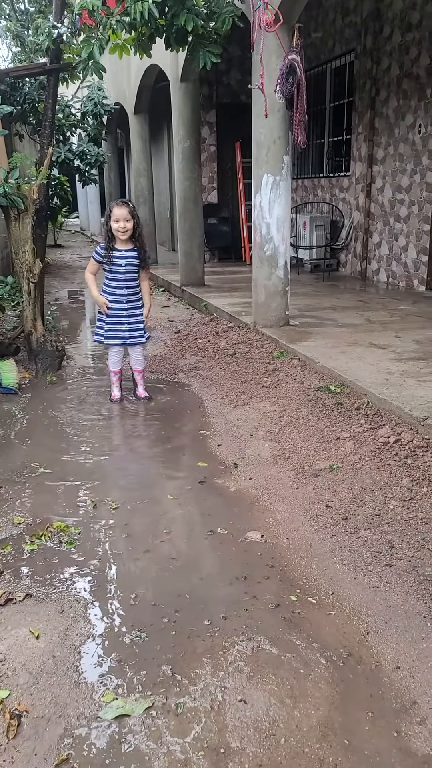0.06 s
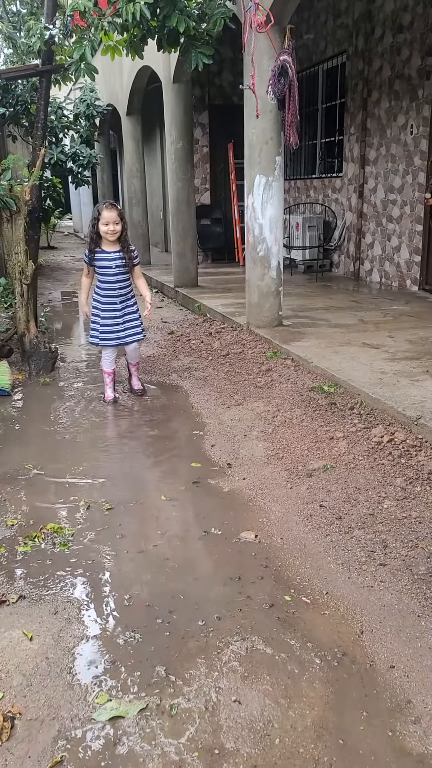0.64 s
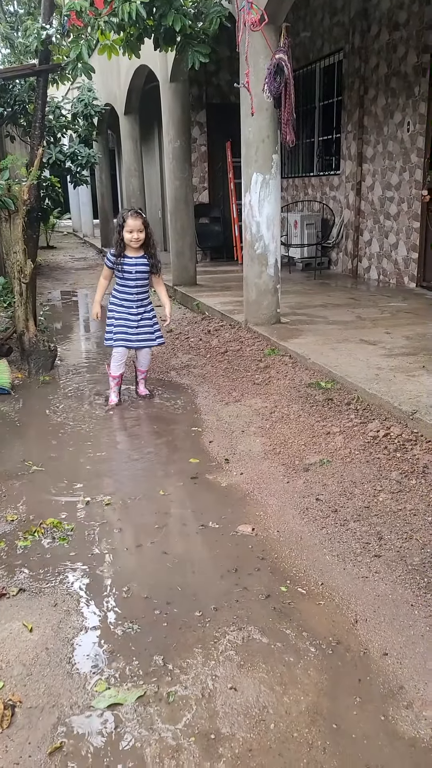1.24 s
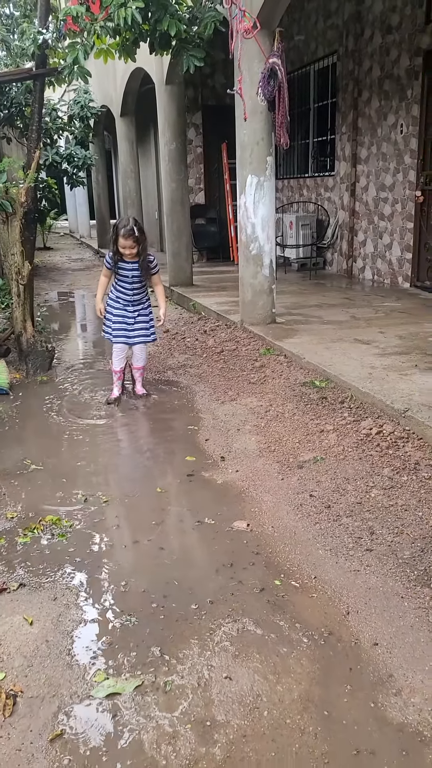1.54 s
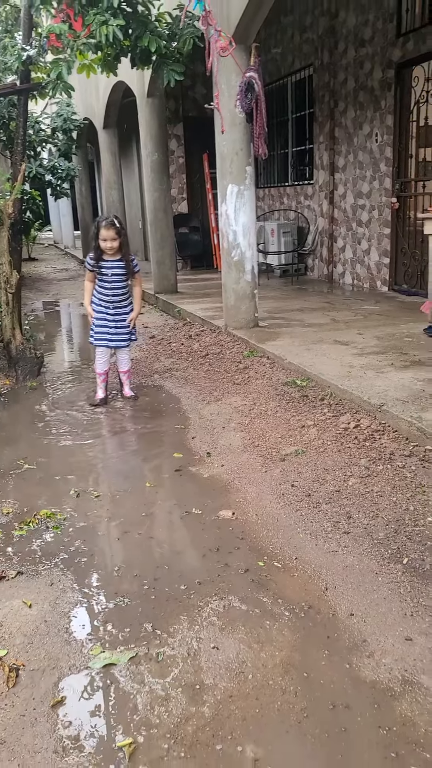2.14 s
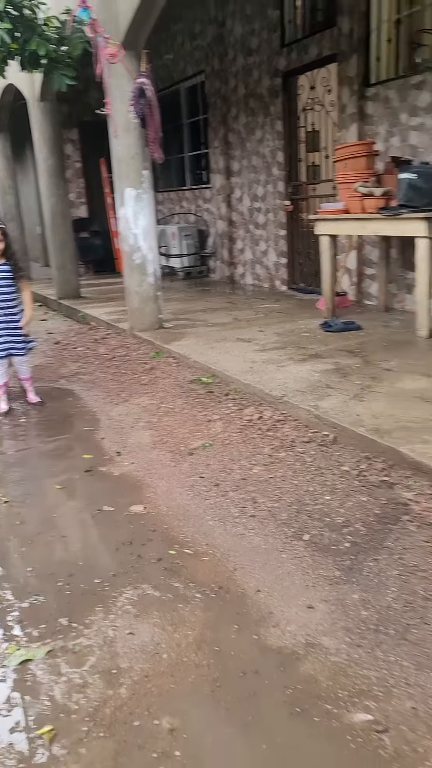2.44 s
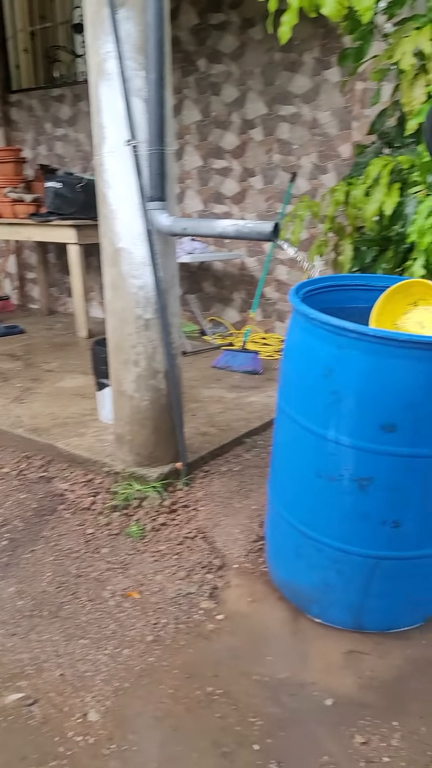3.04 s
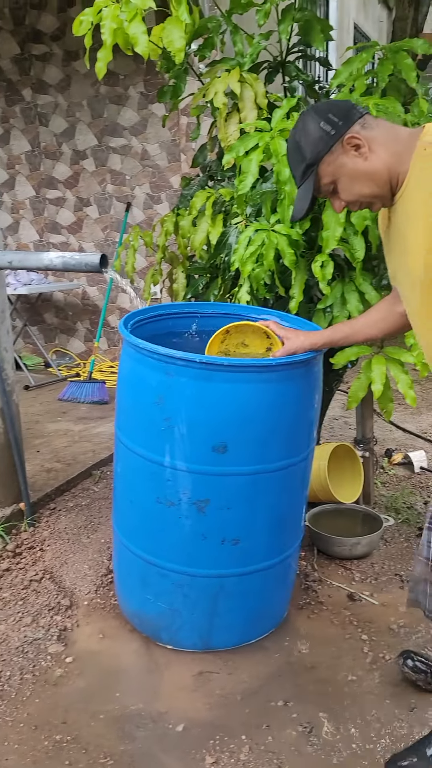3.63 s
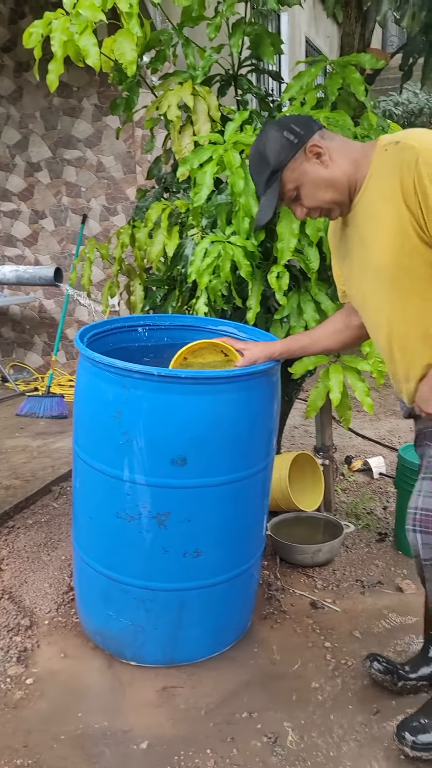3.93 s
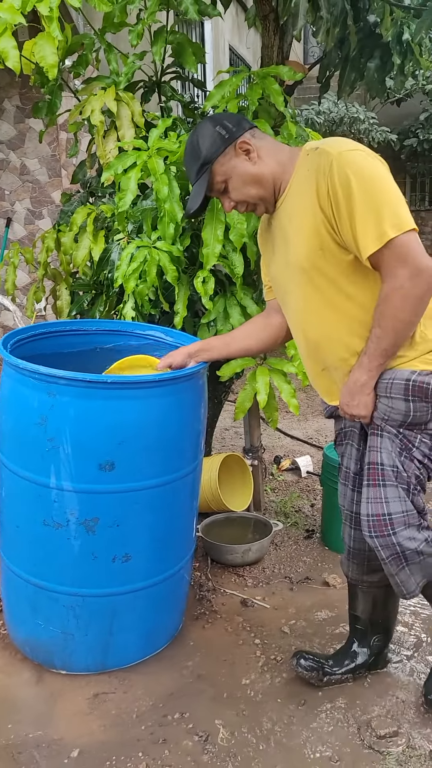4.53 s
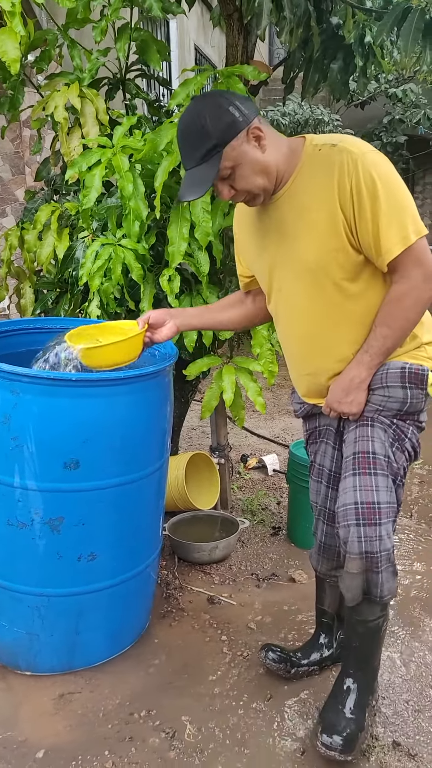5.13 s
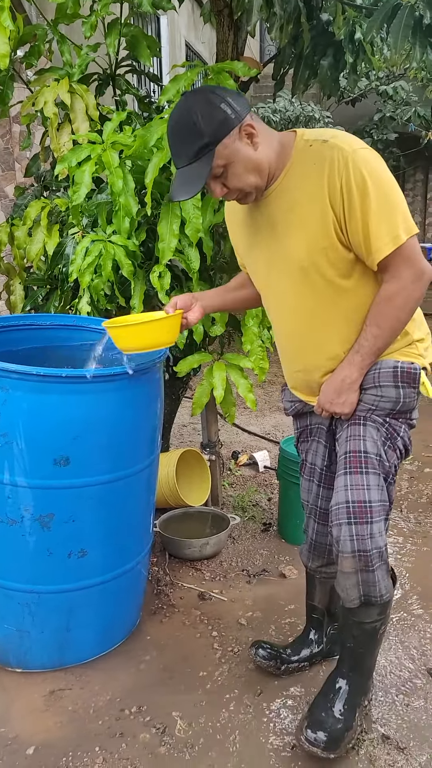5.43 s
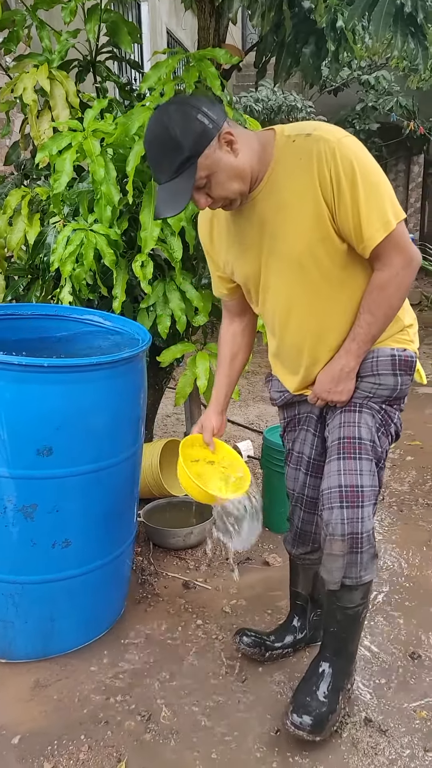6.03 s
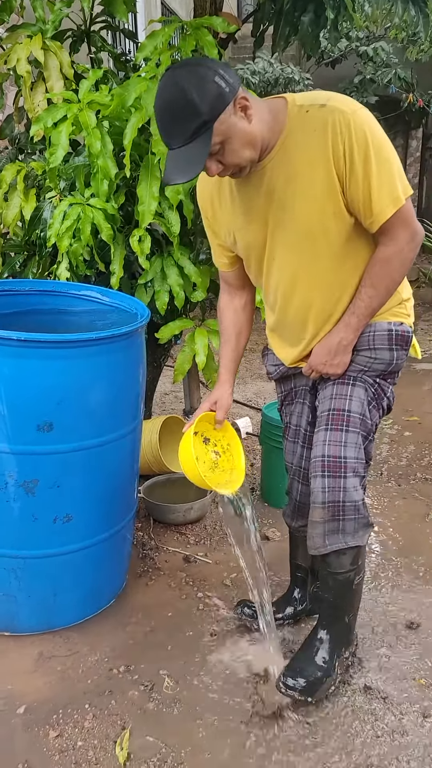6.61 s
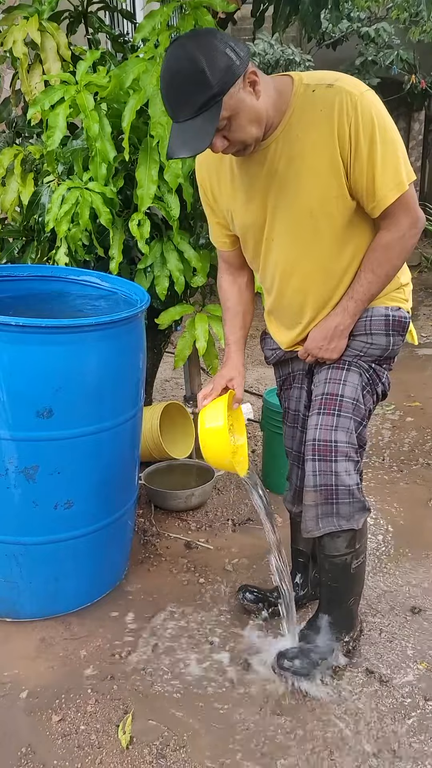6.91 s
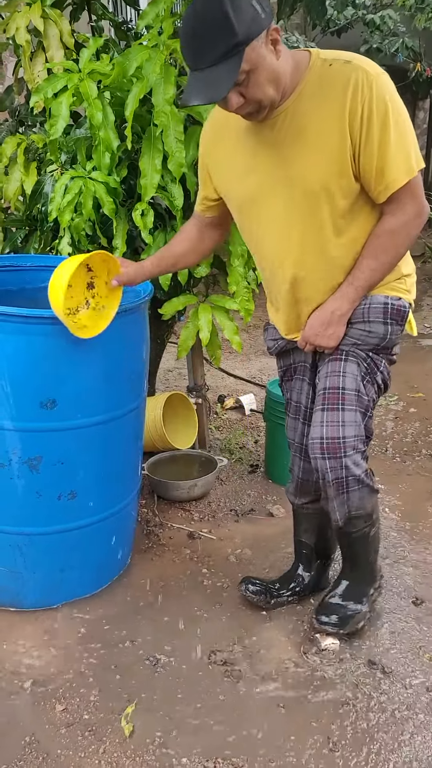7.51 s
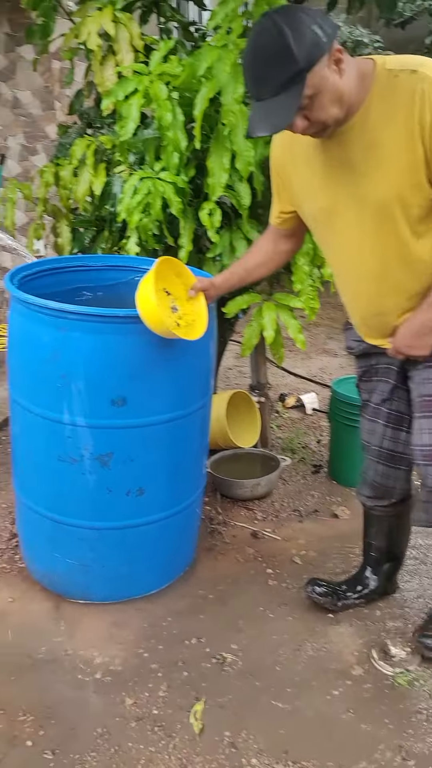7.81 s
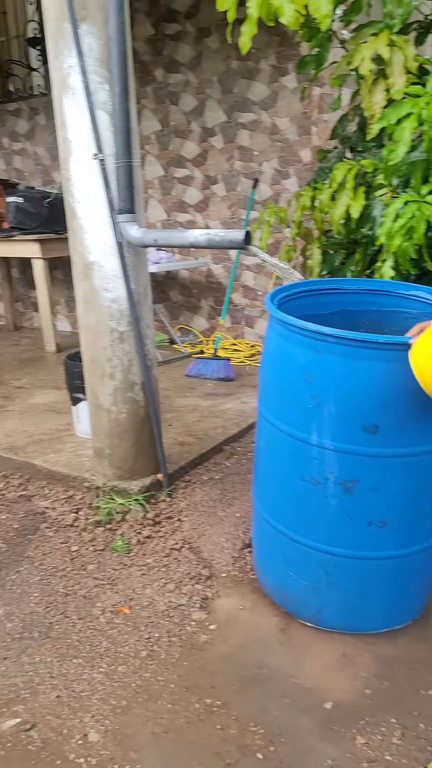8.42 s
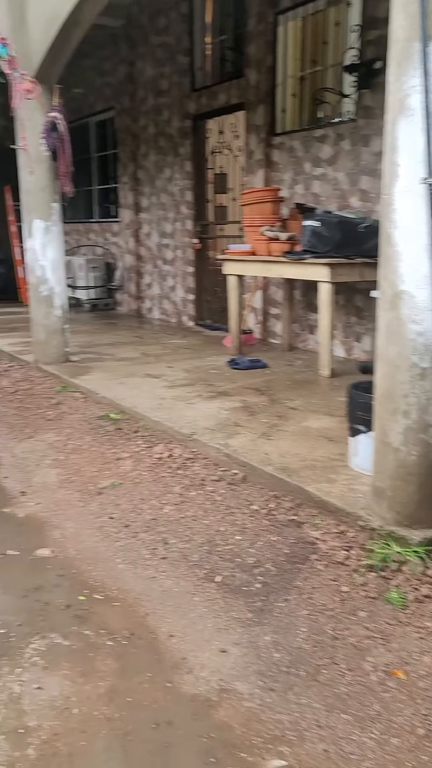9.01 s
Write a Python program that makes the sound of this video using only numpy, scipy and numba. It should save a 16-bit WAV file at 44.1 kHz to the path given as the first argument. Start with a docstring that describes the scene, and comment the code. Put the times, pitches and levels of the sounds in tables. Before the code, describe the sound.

In a wet yard, a downspout trickles into a plastic barrel while two bowlfuls of water are poured over boots, one at the start and one past the middle. Between them come wet gravel footsteps, sloshing and sharp drips. After the second pour the bowl clatters briefly on the barrel's rim and feet squelch again. Handling rumble and soft thumps sit on the microphone, whose left channel is hollow and dull.

```python
"""Pouring water in a wet yard

A downspout trickles into a plastic barrel. A bowl is dipped, lifted dripping and emptied over rubber
boots; the water's sound is many tiny ringing bubbles over a soft hiss. Feet scuff on wet gravel, and
the bowl knocks and drags on the barrel's rim. The hand-held phone rumbles and bumps, and its left
microphone is covered, so that side hears only a hollow, muffled yard."""
import sys
import numpy as np
from scipy import signal
from scipy.fft import rfft, irfft, next_fast_len
from scipy.io import wavfile
from scipy.ndimage import uniform_filter1d
from numba import njit

SR = 44100
rng = np.random.default_rng(int(sys.argv[2]) if len(sys.argv) > 2 else 0)


def to_wav(s):
    """Save 16-bit WAV."""
    ch = np.atleast_2d(s).T  # columns
    pcm = np.round(np.clip(ch, -1, 1) * 32767)  # PCM
    wavfile.write(sys.argv[1], SR, pcm.astype(np.int16))


N = 408366
T = np.arange(N) / SR

# Bowlfuls poured out: start_s, thins_at_s, empty_s, level_db, gurgle_db, mist_db, thinning_s,
# gurgle_loss_db (gurgle and mist count from level_db)
BOWLFULS = [(0.0, 0.47, 1.328, -39.5, -4.5, -6, 0.91, -4.5), (6.174, 6.84, 7.46, -41.5, -10, -2, 0.22, 24)]
THIN_DB = -10  # a thinned stream is quieter
# The spout's steady stream: spray_db, gurgle_db, mist_db
TRICKLE_DB = [-53, -60, -62.5]
# Bumps of the hand and puffs of air on the phone: time_s, level_db, pitch_hz
PHONE_BUMPS = [(0.041, -12, 188), (0.06, -5, 185), (0.084, -19, 84.4), (0.177, -16, 80), (0.432, -15, 182),
               (0.534, -19, 159), (0.709, -21, 138), (0.826, -10, 215), (0.848, -10, 169),
               (0.885, -16.5, 85), (0.96, -19, 221), (1.164, -11, 164), (1.283, -10, 210),
               (1.436, -12.5, 224), (1.537, -12, 161), (3.076, -17, 66), (3.078, -18, 190),
               (3.099, -14, 81.5), (3.294, -13.5, 172), (3.317, -15, 99), (3.341, -14.5, 200),
               (4.203, -10.5, 202), (4.28, -19, 59.4), (4.406, -5, 190), (4.546, -17.5, 160),
               (4.882, -10, 190), (5.35, -16.5, 56.6), (5.546, -16.5, 224), (5.58, -15, 162),
               (5.694, -18, 84), (5.705, -15.5, 200), (6.508, -22, 177), (7.603, -23, 215),
               (7.809, -19, 170), (7.83, -21, 200), (9.222, -14.5, 177)]
# The tone of low bubbles, bright spray and fine mist: frequency_hz, level_db
GURGLE_TONE = [(350, 4.5), (700, -6), (1000, 1), (1500, -1), (1900, 0.5), (2400, -2.5), (3500, -10)]
SPRAY_TONE = [(1500, -10.5), (2300, -9), (2850, -1.5), (4200, 0.5), (5300, -2), (6400, -0.5), (7200, -1),
              (7900, -15.5), (10000, -43)]
MIST_TONE = [(6000, -33), (8000, -9.5), (9100, 1), (10500, -2.5), (13000, 1), (14600, 2.5), (16000, -4)]


def undb(db):
    """Turn decibels into a number to multiply by."""
    return 10 ** (np.asarray(db) / 20)


def unit(x):
    """Scale a sound to an average power of 1."""
    return x / np.sqrt(np.mean(x ** 2))


def colour(x, tone):
    """Turn frequencies up or down along a curve of (frequency_hz, level_db) points."""
    hz, db = np.transpose(tone)
    size = next_fast_len(len(x) + 2048)
    bin_hz = np.maximum(np.arange(size // 2 + 1) * SR / size, 1)
    gain = undb(np.interp(np.log(bin_hz), np.log(hz), db))
    return irfft(rfft(x, size) * gain, size)[:len(x)]


def noise(tone, samples=N):
    """Steady noise with the given tone."""
    return unit(colour(rng.standard_normal(samples), tone))


def wander(rate_hz):
    """A smooth random wobble, about 1 in size."""
    hold = int(SR / rate_hz)
    held = rng.standard_normal(2000)[np.arange(N) // hold]
    return unit(uniform_filter1d(uniform_filter1d(held, hold), hold))


def add(track, start_s, sound):
    """Mix a sound into a track at the given time."""
    i = max(int(start_s * SR), 0)
    track[i:i + len(sound)] += sound[:N - i]


@njit
def ring_bubbles(starts, hz, cycles, sizes, glide):
    """Fading tones that rise in pitch, as a bubble does when it nears the surface."""
    out = np.zeros(N)
    for k in range(len(starts)):
        life = cycles[k] * SR / hz[k]
        phase = 0.
        for i in range(min(int(life) + 2, N - starts[k])):
            phase += 2 * np.pi * hz[k] * (1 + glide * i / life) / SR
            out[starts[k] + i] += sizes[k] * np.exp(-5 * i / life) * np.sin(phase)
    return out


def grains(tone, low_hz, high_hz, cycles, spread_db, count, hiss_db=3):
    """A cloud of tiny pings, some louder than others, over the hiss of those too small to tell apart."""
    when, pitch, length, size = rng.random((count, 4)).T
    hz = low_hz * (high_hz / low_hz) ** pitch
    sizes = undb(-spread_db * np.log(np.maximum(size, .004))) * np.sqrt(hz)
    cloud = ring_bubbles((when * N).astype(np.int64), hz, cycles * (.5 + length), sizes, glide=0.046)
    return unit(colour(unit(cloud) + undb(hiss_db) * rng.standard_normal(N), tone))


def bowl_flow(start_s, thins_at_s, empty_s, thinning_s):
    """A tipped bowl: whether water is falling (0-1), and how far its sheet has thinned (0-1)."""
    falling = np.interp(T, [start_s - .012, start_s, empty_s, empty_s + .066], [0, 1, 1, 0])
    thinned = 1 - np.exp(-np.maximum(T - thins_at_s, 0) / thinning_s)
    return falling, thinned


def pours():
    """A sheet of water breaks on boots and ground: bubbles, spray and mist surge together."""
    # Small drops on rubber and stone: frequency_hz, level_db
    patter_tone = [(3000, -3), (4800, -8), (6300, -0.5), (7200, 0), (7900, -15), (9200, -23), (11000, -40)]
    gurgle = grains(GURGLE_TONE, 642, 2650, cycles=14, spread_db=1.5, count=7000, hiss_db=3.5)
    spray = grains(SPRAY_TONE, 2530, 6960, cycles=26, spread_db=2.4, count=11000, hiss_db=3.5)
    patter = grains(patter_tone, 3500, 9800, cycles=38, spread_db=1.7, count=5500, hiss_db=0.5)
    mist = grains(MIST_TONE, 8000, 17000, cycles=12, spread_db=2.6, count=11000, hiss_db=2.5)
    fine_drops = undb(1) * patter + undb(3.5) * mist
    out = np.zeros(N)
    for start_s, thins_at_s, empty_s, db, gurgle_db, mist_db, thinning_s, gurgle_loss_db in BOWLFULS:
        falling, thinned = bowl_flow(start_s, thins_at_s, empty_s, thinning_s)
        # More of the water turns to mist as it first hits, and again as it thins.
        burst_db = 5.5 * np.exp(-np.maximum(T - start_s, 0) / 0.11)
        high = undb(mist_db + burst_db + 5 * thinned) * fine_drops
        low = undb(gurgle_db + 6.5 - gurgle_loss_db * thinned) * gurgle
        out += falling * undb(db + THIN_DB * thinned) * (low + undb(4) * spray + high)
    return out * undb(1.15 * wander(70))


def trickle_and_slosh():
    """Spout, dipped bowl, poured water and feet squelching in puddles stir up bubbles, spray and fizz."""
    # Swells of sloshing water: middle_s, half_length_s, spray_db, gurgle_db, mist_db
    sloshes = [(1.457, 0.075, -53, -61, -72), (2.025, 0.16, -45, -45, -60),
               (2.693, 0.15, -50, -54.5, -55.5), (3.283, 0.068, -47, -59, -53),
               (3.707, 0.026, -48, -44, -53), (4.34, 0.056, -46, -54, -50), (4.95, 0.064, -75, -62, -88),
               (5.096, 0.021, -48.5, -68, -60), (5.305, 0.18, -51, -52, -59), (6.155, 0.029, -48, -72, -49),
               (7.285, 0.05, -45, -52, -49), (7.58, 0.2, -51.5, -51, -65), (7.744, 0.0095, -43, -50, -51),
               (7.855, 0.026, -44, -41, -62), (8.266, 0.063, -55, -53.5, -69),
               (8.677, 0.055, -47.5, -47, -55), (8.773, 0.02, -40, -52, -47),
               (8.894, 0.081, -45.5, -47, -52)]
    power = undb(TRICKLE_DB)[:, None] ** 2
    for middle_s, half_s, *levels_db in sloshes:
        power = power + undb(levels_db)[:, None] ** 2 * np.exp(-((T - middle_s) / half_s) ** 2)
    spray_db, gurgle_db, mist_db = 10 * np.log10(power)
    gurgle = grains(GURGLE_TONE, 754, 2705, cycles=20, spread_db=2, count=5500, hiss_db=0)
    spray = grains(SPRAY_TONE, 2400, 8250, cycles=36, spread_db=1.9, count=9000, hiss_db=5)
    mist_db += wander(14)
    fizz = grains(MIST_TONE, 6800, 17000, cycles=16, spread_db=2.2, count=7000)
    water = undb(gurgle_db + 5) * gurgle + undb(spray_db + 3.5) * spray + undb(mist_db + 5.5) * fizz
    return water * undb(1.5 * wander(45))


def hand_noise():
    """A restless hand: both microphones share most of its low rumble, but less of its higher rubbing."""
    # How restless the hand is: time_s, level_db
    unrest = [(0.0, -27.5), (0.87, -24.5), (1.57, -25.5), (1.95, -35), (2.3, -33), (2.85, -32.5),
              (3.03, -26.5), (3.35, -25.5), (3.6, -33.5), (4.05, -31), (4.35, -31.5), (4.92, -29),
              (5.3, -36), (5.64, -29.5), (5.98, -40), (7.4, -39), (7.86, -35), (9.26, -37.5)]
    # The tone of the hand's deep sway, rumble and rubbing: frequency_hz, level_db
    sway_tone = [(12, -52), (24, -27), (40, -4.5), (55, -2.5), (85, -5.5), (110, -8), (160, -13),
                 (400, -79)]
    rumble_tone = [(60, -9), (115, -9.5), (170, 0), (225, -2), (280, -9.5), (380, -17.5), (900, -57)]
    rub_tone = [(150, -20), (290, -9.5), (380, 1), (500, -8.5), (700, -11), (900, -20), (1500, -25.5),
                (4000, -41)]
    unrest_db = np.interp(T, *np.transpose(unrest)) + 25  # near 0 when most restless
    slip = np.zeros(N)  # the fingers slip at each bump
    for time_s, db, _ in PHONE_BUMPS:
        add(slip, time_s, undb(db - 26.5) * np.exp(-T[:SR // 4] / 0.02))
    rumble_gain = undb(unrest_db - 24.5)
    rub_gain = np.hypot(undb(unrest_db - 40), slip)
    flutter = unit(undb(2 * wander(35)))
    shared = rumble_gain * noise(rumble_tone) + rub_gain * noise(rub_tone)
    each_side = np.array([rub_gain * undb(1.5) * noise(rub_tone)
                          + rumble_gain * undb(-12) * noise(rumble_tone) for _ in range(2)])
    sway = undb(0.66 * unrest_db - 26.5 + 0.74 * wander(9)) * noise(sway_tone)
    return sway + flutter * (shared + each_side)


def stray_drops(count, low_hz=2600, high_hz=7350, spatter_db=-15):
    """Random rows for wet_ticks(): the stronger the trickle or pour, the louder the drops it throws."""
    running = undb(TRICKLE_DB[0])
    for start_s, thins_at_s, empty_s, db, _, _, thinning_s, _ in BOWLFULS:
        falling, thinned = bowl_flow(start_s, thins_at_s, empty_s, thinning_s)
        running = np.hypot(running, falling * undb(db + THIN_DB * thinned))
    when, size, pitch = rng.random((count, 3)).T
    starts = (when * N).astype(int)
    db = 20 * np.log10(running[starts]) + 12 + 4.5 * (2 * size - 1)
    hz = low_hz * (high_hz / low_hz) ** pitch
    return list(zip(T[starts], db, hz, [spatter_db] * count))


def wet_ticks():
    """Each drop, heel click or small tap is a slap, a brief ping and a short tail of spatter."""
    # Loud drops, heel clicks and small taps: start_s, level_db, pitch_hz, spatter_db
    sharp_ticks = [(0.0218, -24.5, 2920, -16), (0.199, -20, 2740, -27), (0.2209, -17.5, 2840, -27),
                   (0.3336, -19, 4100, -24), (0.4244, -30, 2160, -4), (0.5284, -20.5, 4150, -13),
                   (0.6034, -34, 3640, -3), (0.7093, -23.5, 6250, -10), (1.103, -29, 1060, -4),
                   (1.211, -34, 5900, 4), (1.805, -24, 3090, -15), (1.987, -30, 4470, -5),
                   (2.475, -30, 4180, -16), (2.8174, -29.5, 4430, -5), (3.3503, -28, 3300, -26),
                   (3.4404, -22.5, 1050, -20), (3.545, -34.5, 4100, -10), (3.61, -36, 3600, -11),
                   (3.81, -29, 5000, -7), (4.3079, -20, 6660, -25), (4.406, -23, 3000, -8),
                   (4.426, -29, 3640, -8), (4.7321, -29, 2600, -11), (4.7897, -26, 3900, -15),
                   (5.309, -27, 3550, -15), (5.468, -29, 5650, -16), (5.8268, -21.5, 3180, -12),
                   (5.872, -20.5, 4200, -5.5), (5.9068, -25, 5660, -9), (6.1652, -20, 2920, -10),
                   (6.2203, -29, 4400, -2), (6.3804, -23.5, 2760, -12), (6.6288, -26, 9750, -7),
                   (6.7765, -28.5, 6900, 4), (6.856, -25, 6200, -17), (6.8725, -21.5, 6860, -15),
                   (6.983, -32, 6450, -14), (7.239, -26, 6000, -6), (7.298, -27, 5900, -17),
                   (7.3831, -32, 1350, 5), (7.446, -31, 6200, -8), (7.4589, -26, 6240, -10),
                   (7.5028, -24, 3600, -14), (7.6107, -29, 6870, -6.5), (7.6425, -24, 6800, -8),
                   (7.781, -24.5, 6270, -5), (8.851, -22.5, 6900, -15), (9.201, -26, 5200, -11)]
    out, t = np.zeros(N), T[:SR // 8]
    hit, tail = np.exp(-t / 0.0018), np.exp(-t / 0.022)
    slap_shape = hit + undb(-12.5) * tail
    spatter_shape = (1 - np.exp(-t / 0.0014)) * (hit + undb(-22.5) * tail)
    fade_in = 1 - np.exp(-t / 0.0011)
    for start_s, db, hz, spatter_db in list(sharp_ticks) + stray_drops(count=30):
        slap_noise, spatter_noise = rng.standard_normal((2, len(t)))
        tilt_db_per_octave = 2 * rng.standard_normal()  # brighter or duller spatter
        # The slap is turned down away from the tick's own pitch.
        slap_tone = [(f, level - 8 * abs(np.log2(f / hz))) for f, level in SPRAY_TONE]
        spatter_tone = [(f, level + tilt_db_per_octave * np.log2(f / hz)) for f, level in MIST_TONE]
        slap = undb(-2) * slap_shape * unit(colour(slap_noise, slap_tone))
        spatter = undb(spatter_db + 13.5) * spatter_shape * unit(colour(spatter_noise, spatter_tone))
        ping = undb(5.5) * np.sin(2 * np.pi * hz * t * (1 + 10 * t)) * np.exp(-t / 0.0016)
        add(out, start_s, undb(db) * fade_in * (ping + slap + spatter))
    return out


def bumps(swell_cycles=0.7, sag_per_s=1.7):
    """Soft blows on the phone swell and die within a few cycles, sinking in pitch."""
    out, t = np.zeros(N), T[:SR // 6]
    for start_s, db, hz in PHONE_BUMPS:
        turns = hz * t / (1 + sag_per_s * t)
        swell = hz * t / swell_cycles
        add(out, start_s, undb(db - 3) * swell * np.exp(1 - swell) * np.sin(2 * np.pi * turns))
    return out


def ringing_notes(cycles=17.7):
    """Bubbles in the water and a sharp tap of the bowl each ring briefly."""
    # Short ringing notes: start_s, level_db, pitch_hz
    notes = [(1.107, -22, 1700), (1.295, -25, 2020), (3.4407, -20, 1940), (3.441, -20, 940),
             (3.447, -16, 3370), (4.79, -27, 2600), (5.2, -41, 1800), (5.245, -34, 1150),
             (5.6243, -36, 1270), (5.627, -30, 2730), (5.827, -25, 3050), (6.167, -20, 2930),
             (6.443, -30.5, 800), (6.47, -27, 1120), (6.518, -26, 1480), (6.521, -32, 1880),
             (7.808, -22, 2320), (8.27, -32, 1380), (8.44, -27, 970), (8.458, -16, 6600),
             (8.645, -27, 1560), (8.698, -24, 2050), (8.817, -13.5, 1800), (8.8195, -16, 4630),
             (8.87, -19, 1800)]
    start_s, db, hz = np.transpose(notes).copy()
    starts = (start_s * SR).astype(np.int64)
    return ring_bubbles(starts, hz, np.full(len(hz), cycles), undb(db + 1), glide=0.042)


def footsteps():
    """Heel, then sole, presses into wet gravel; water squelches out as the stones settle."""
    # Steps: sole_lands_s, level_db, crunch_db, grit_db, heel_lead_s, press_s, settle_s (to fall 60 dB)
    footfalls = [(1.192, -30.5, -14, -22, 0.001, 0.002, 0.27),
                 (1.587, -22.5, -17, -17.5, 0.062, 0.013, 0.35),
                 (1.792, -35.5, -8, -21, 0.002, 0.0034, 0.22),
                 (2.0566, -35.5, -8.5, -38, 0.075, 0.014, 0.55),
                 (2.4935, -28, -18, -21, 0.017, 0.0043, 0.31), (3.7366, -40, -4, -18, 0.022, 0.0046, 0.48),
                 (4.094, -38.5, -11.5, -16.5, 0.0076, 0.0047, 0.96),
                 (4.423, -27.5, -21, -21, 0.012, 0.0036, 0.13),
                 (7.803, -26.5, -11.5, -17, 0.025, 0.0053, 0.36),
                 (8.083, -34, -11.5, -14.5, 0.013, 0.0046, 0.41),
                 (8.359, -44.5, -7.5, -11, 0.11, 0.0043, 0.84),
                 (8.457, -31, -18, -13, 0.0021, 0.0035, 0.34),
                 (8.695, -30.5, -13.5, -20, 0.012, 0.0046, 0.36),
                 (8.816, -18, -20.5, -17.5, 0.005, 0.0032, 0.18),
                 (9.22, -31.5, -13, -13.5, 0.02, 0.0015, 0.32)]
    # A sole scraping stones: frequency_hz, level_db
    scrape_tone = [(900, -1), (1500, -19), (2300, -5), (3000, 1.5), (4200, 2), (5300, 0.5), (6400, 1.5),
                   (7200, 1), (7900, -17), (10000, -37)]
    crunch = grains(GURGLE_TONE, 656, 2360, cycles=12, spread_db=1.9, count=8000, hiss_db=0)
    scrape = grains(scrape_tone, 2060, 7900, cycles=9.6, spread_db=3, count=20000, hiss_db=1)
    grit = grains(MIST_TONE, 8700, 22000, cycles=3.1, spread_db=0, count=25000)
    power, t = np.zeros((3, N)), T[:SR // 2] - .1  # the foot strikes at t = 0
    before, after = np.minimum(t, 0), np.maximum(t, 0)
    for sole_s, db, crunch_db, grit_db, heel_lead_s, press_s, settle_s in footfalls:
        strike, settle = np.exp(-after / 0.002), undb(-5 - 60 * after / settle_s)
        shape = np.exp(before / press_s) * (strike + settle)
        # The heel lands softer than the sole and squeezes out less water.
        heel = (sole_s - heel_lead_s, min(-29, db - 2), crunch_db - 4.5)
        sole = (sole_s, db, crunch_db)
        for lands_s, contact_db, wet_db in (heel, sole):
            for track, layer_db in zip(power, (wet_db + 10, -2.5, grit_db + 9)):
                add(track, lands_s + t[0] + 0.0032, (undb(contact_db + layer_db) * shape) ** 2)
    return np.sum(np.sqrt(power) * [crunch, scrape, grit], axis=0)


def knocks():
    """Each knock rings with the same set of tones, which share the blow anew each time; the rim rattles. Most
    are plastic struck at a new spot, but the first, at 1.446 s, is a knock on the phone itself."""
    # Hollow knocks (the first, at 1.446 s, is on the phone itself): start_s, level_db, pitch_ratio (1 is the
    # usual ring)
    blows = [(1.446, -15, 0.9), (4.216, -24, 0.91), (4.407, -30, 0.9), (5.473, -30.5, 0.99),
             (7.504, -22, 0.96), (7.563, -29, 1.04), (7.607, -29, 0.96), (7.645, -32.5, 1.05),
             (7.667, -32, 0.85), (7.977, -31, 1.17), (8.817, -29.5, 1.11)]
    # The tones the plastic rings with: pitch_hz, level_db, ring_s (to fall 60 dB)
    plastic_tones = [(273.3, 0.5, 0.21), (400, 0, 0.035), (618, -7, 0.049), (700, 0, 0.043),
                     (780, 2, 0.011), (1100, -11, 0.02), (1430, -12, 0.033)]
    # The rim's rattle: frequency_hz, level_db
    rattle_tone = [(300, -11), (550, -22), (830, 8), (1200, -6), (3000, -36)]
    out, t = np.zeros(N), T[:SR // 4]
    hz, tone_db, ring_s = np.transpose(plastic_tones)[:, :, None]
    for start_s, db, pitch_ratio in list(blows) + rim_drag(count=22):
        share, detune = rng.standard_normal((2, len(hz), 1))
        fade = undb(tone_db + 2 * share - 60 * t / ring_s)
        tones = fade * np.sin(2 * np.pi * hz * pitch_ratio * (1 + 0.018 * detune) * t)
        rattle = undb(-7.5) * np.exp(-t / 0.01) * noise(rattle_tone, len(t))
        add(out, start_s, undb(db - 6) * (tones.sum(0) + rattle))
    return out


def splatter(start_s=6.3, length_s=0.42, start_hz=830, end_hz=2140, cycles=20.0, count=270):
    """Water slaps into the pool around a boot; as the sheet narrows, its bubbles get smaller and higher."""
    progress = rng.random(count)
    tune, size = rng.standard_normal((count, 2)).T
    hz = start_hz * (end_hz / start_hz) ** progress * 2 ** (0.366 * tune)
    sizes = undb(-38.5 + 3 * size) * np.sin(np.pi * progress)
    starts = ((start_s + length_s * progress) * SR).astype(np.int64)
    return ring_bubbles(starts, hz, np.full(count, cycles), sizes, glide=0.08)


def churn(middle_s=6.96, half_length_s=0.11):
    """The narrowing stream drags air into the puddle, making a swell of deep bubbles."""
    # The churning puddle: frequency_hz, level_db
    churn_tone = [(180, -21), (280, 0.5), (400, -3), (480, -4.5), (800, -43)]
    swell = np.exp(-((T - middle_s) / half_length_s) ** 2 / 2)
    return undb(-38) * swell * grains(churn_tone, 263, 460, cycles=10, spread_db=2.5, count=1500)


def rim_drag(count, start_s=7.565, length_s=0.135, start_ratio=1.1, end_ratio=0.86):
    """Rows for knocks(): the empty bowl sticks and slips along the rim, sinking in pitch."""
    late, size, tune = rng.random((count, 3)).T
    progress = (np.arange(count) + late) / count
    pitch_ratio = start_ratio + (end_ratio - start_ratio) * progress + 0.14 * (tune - .5)
    return list(zip(start_s + length_s * progress, -38 + 6 * (size - .5), pitch_ratio))


def yard_echo(sound, fade_s=0.22, echo_db=-12):
    """Ground, wall and porch add a short, faint echo to a sound."""
    t = T[:SR // 2]
    tail = rng.standard_normal(len(t)) * undb(-60 * t / fade_s) * (t > .004)
    tail /= np.sqrt(np.sum(tail ** 2))
    return sound + undb(echo_db) * signal.fftconvolve(sound, tail)[:N]


def scene():
    """The sound that reaches the phone's left and right microphones."""
    water = pours() + churn() + splatter() + trickle_and_slosh()
    short_sounds = wet_ticks() + ringing_notes() + footsteps() + knocks()
    return water + yard_echo(short_sounds) + bumps() + hand_noise()


def record(dry):
    """Air trapped over the covered left microphone rings hollow; above that, only faint hiss is left."""
    hollow_hz, hollow_width_hz, cover_hz, low_cut_hz, top_cut_hz = 727, 140, 1530, 30.6, 15900
    trapped_air = signal.bilinear([1], [1, hollow_width_hz / hollow_hz, 1], SR / (2 * np.pi * hollow_hz))
    cover = signal.butter(2, cover_hz, fs=SR)
    low_cut = signal.butter(1, low_cut_hz, "high", fs=SR)
    left, right = dry
    for stage in (trapped_air, cover, low_cut):
        left = signal.lfilter(*stage, left)
    left = undb(-1) * left + undb(-80) * rng.standard_normal(N)
    top_cut = signal.ellip(10, .2, 80, top_cut_hz, fs=SR, output="sos")
    return signal.sosfilt(top_cut, [left, right])


dry = scene()
out = record(dry)
to_wav(out)
```